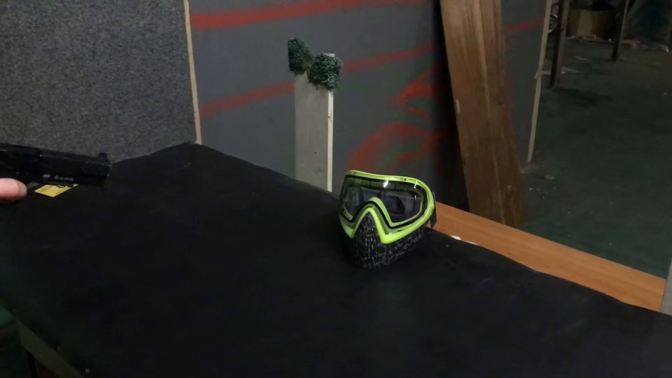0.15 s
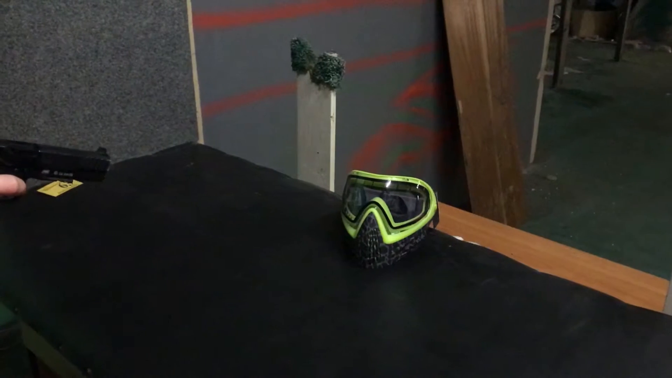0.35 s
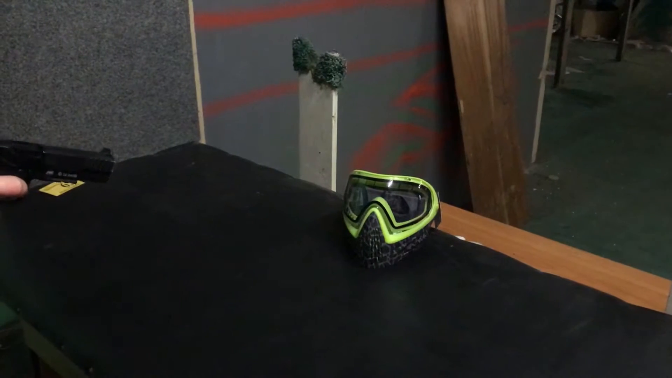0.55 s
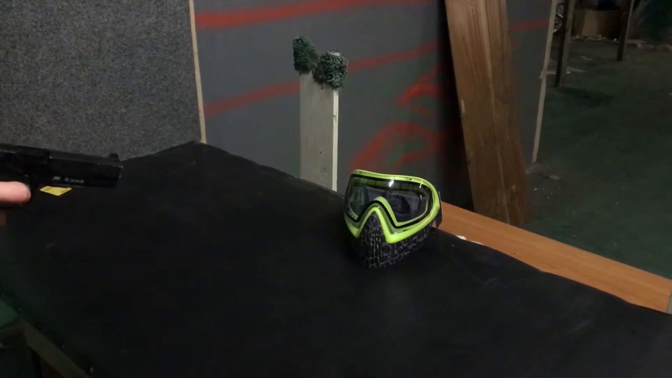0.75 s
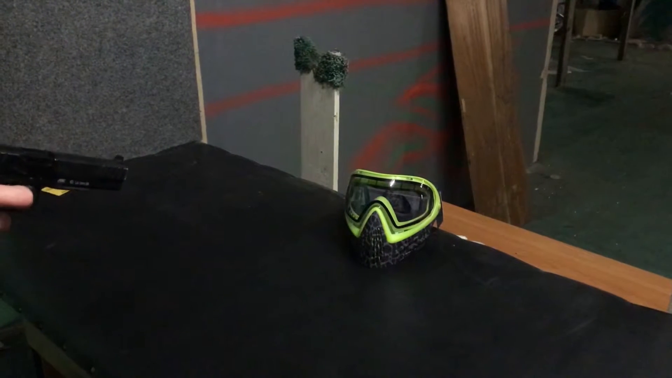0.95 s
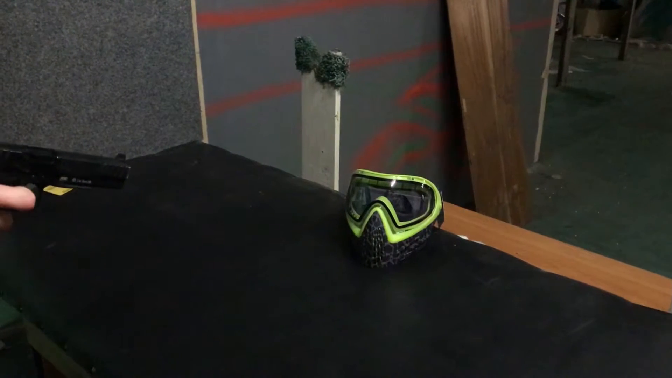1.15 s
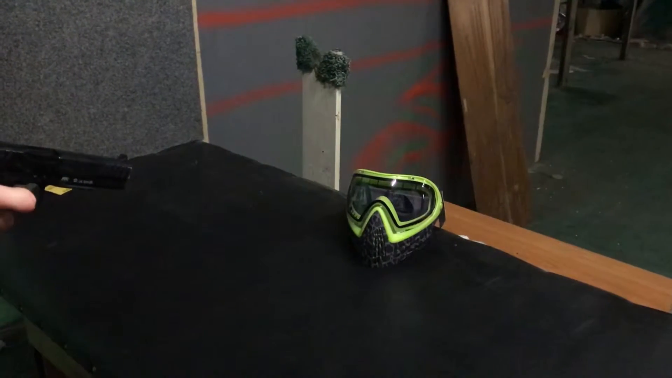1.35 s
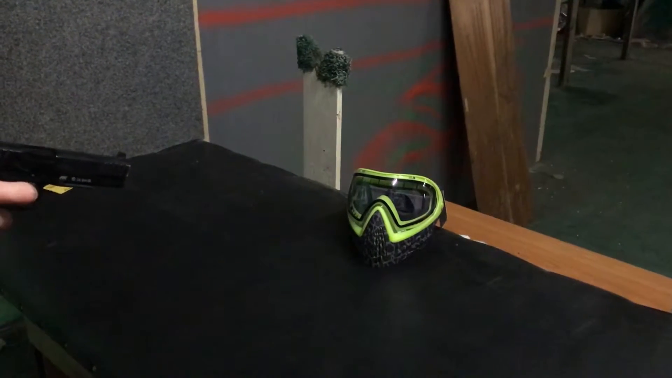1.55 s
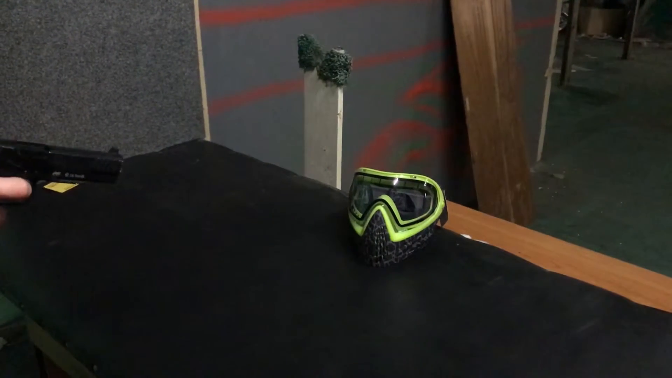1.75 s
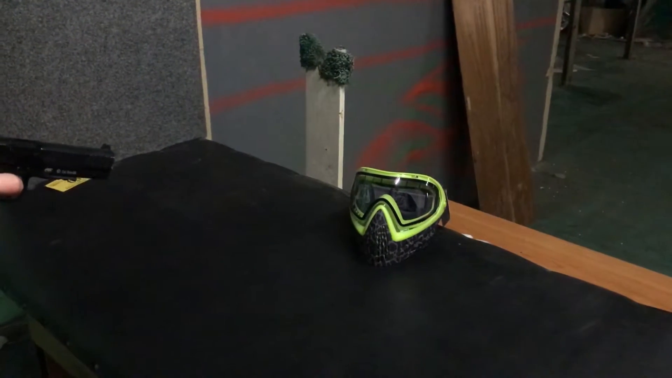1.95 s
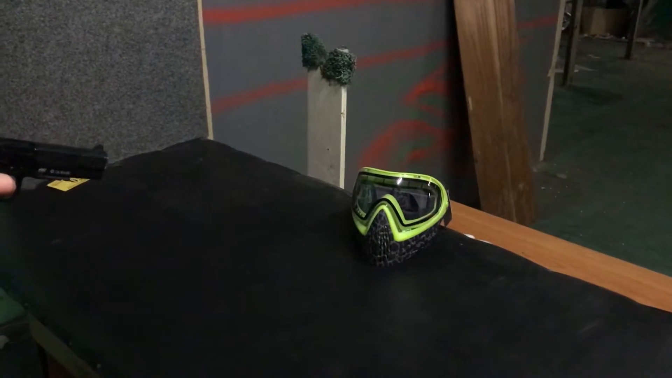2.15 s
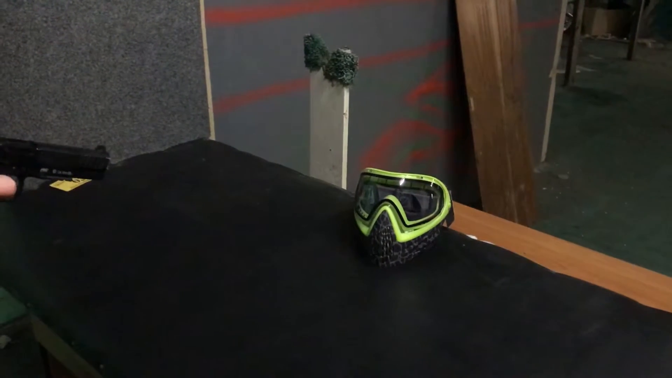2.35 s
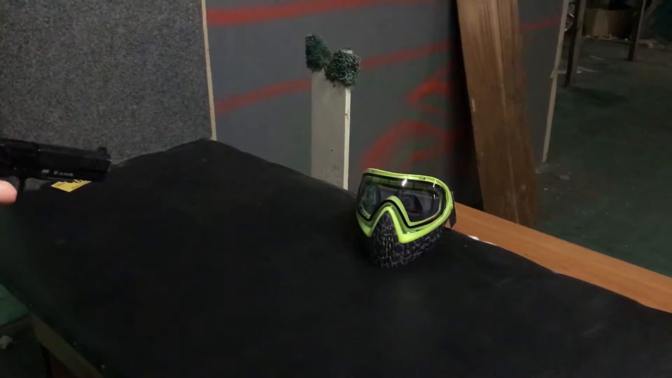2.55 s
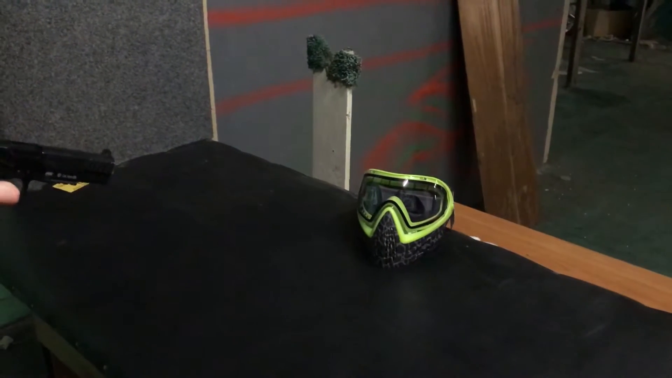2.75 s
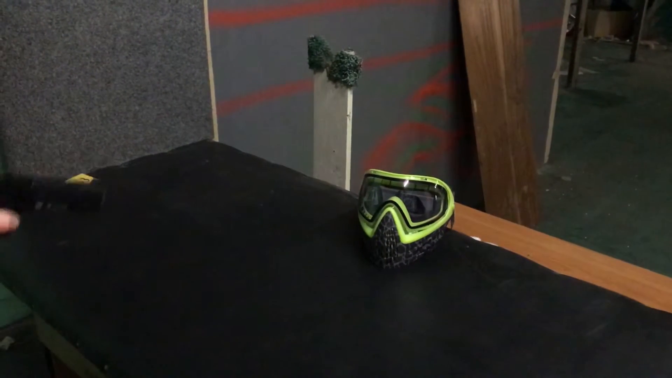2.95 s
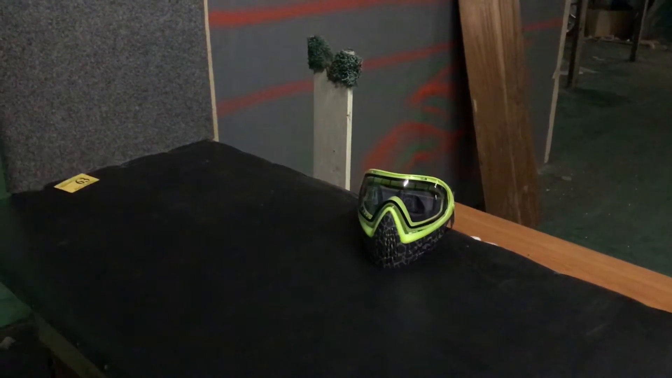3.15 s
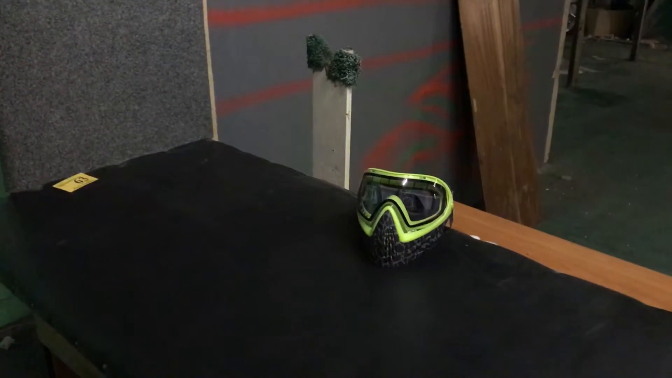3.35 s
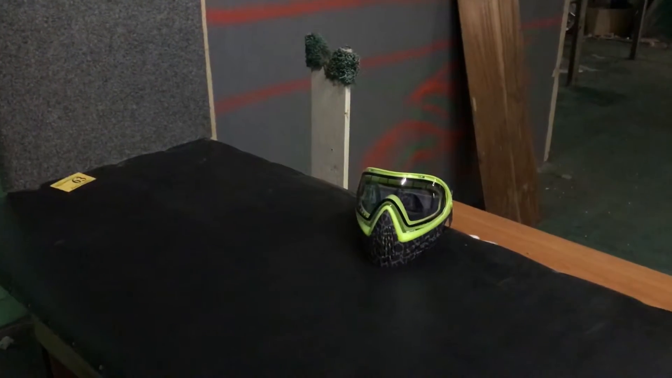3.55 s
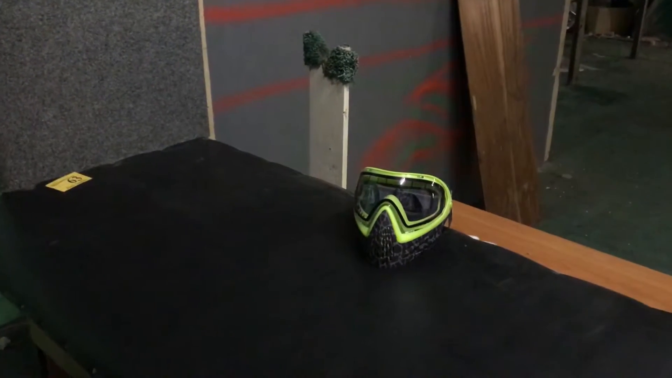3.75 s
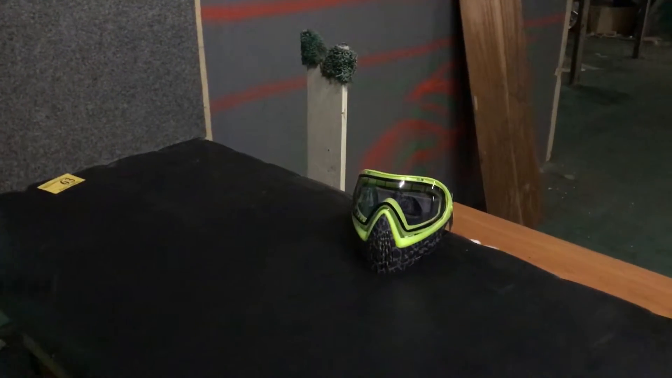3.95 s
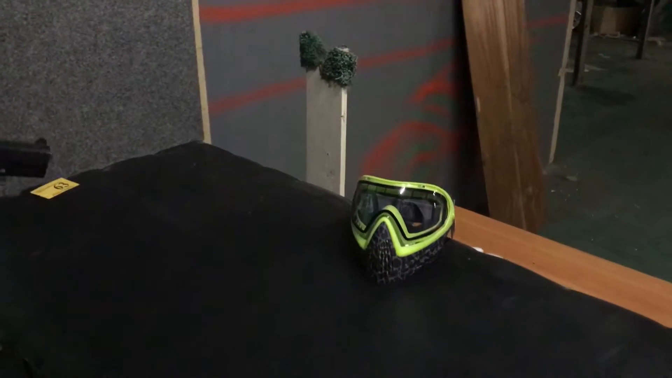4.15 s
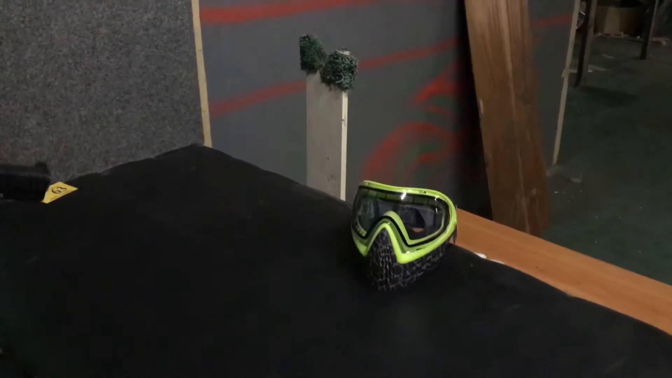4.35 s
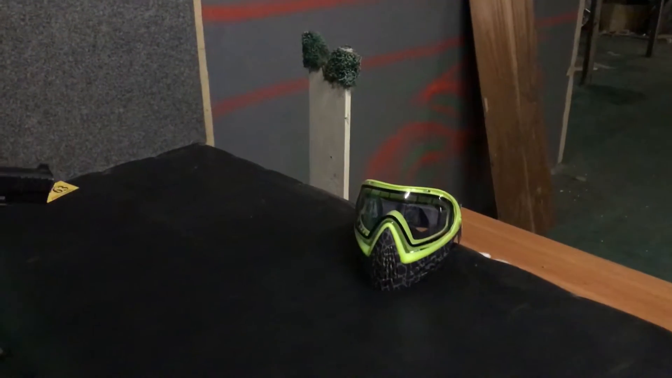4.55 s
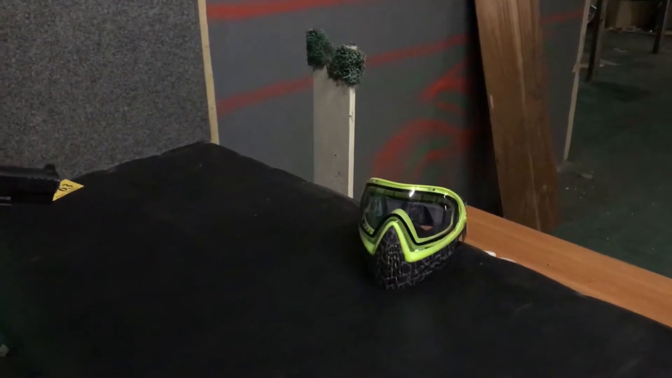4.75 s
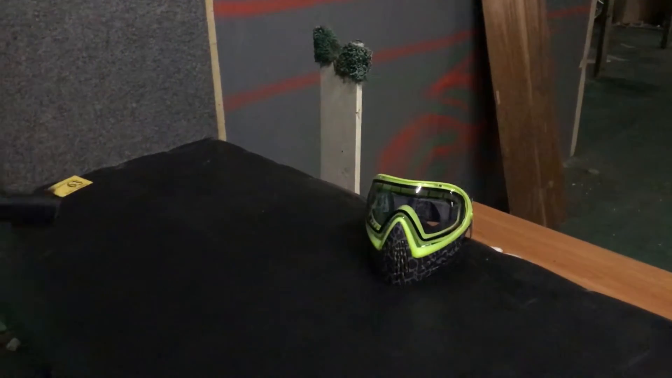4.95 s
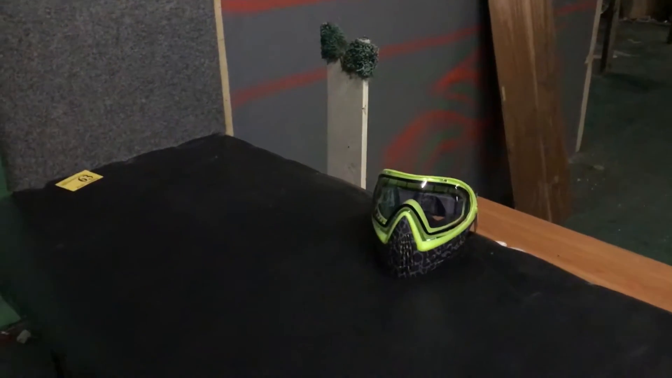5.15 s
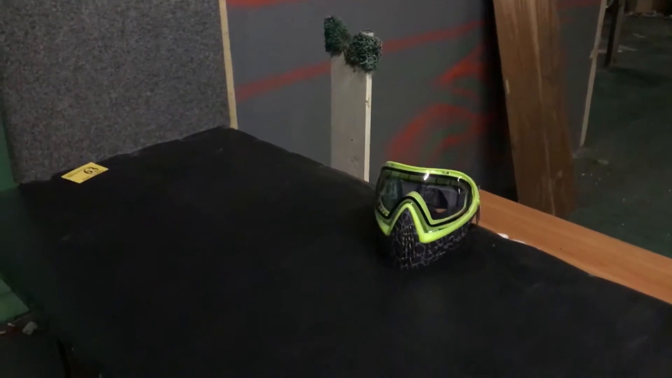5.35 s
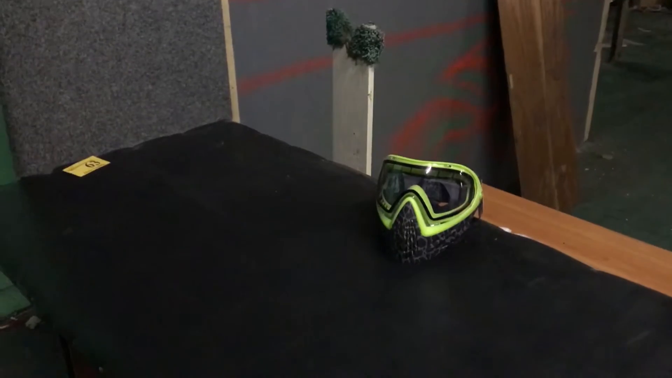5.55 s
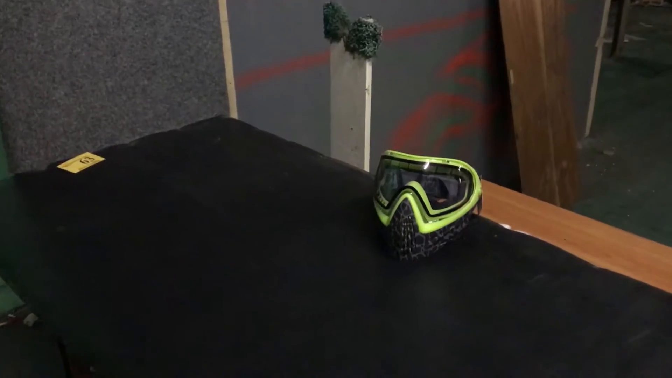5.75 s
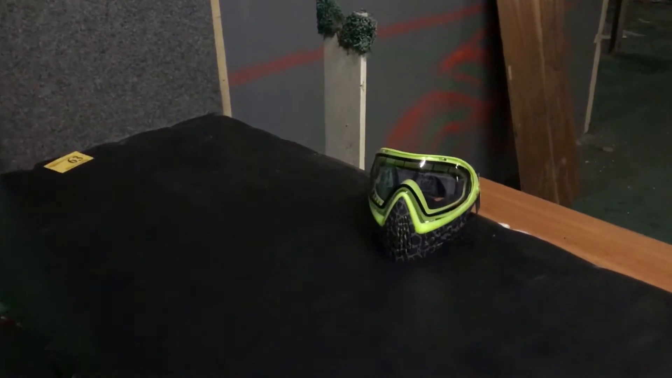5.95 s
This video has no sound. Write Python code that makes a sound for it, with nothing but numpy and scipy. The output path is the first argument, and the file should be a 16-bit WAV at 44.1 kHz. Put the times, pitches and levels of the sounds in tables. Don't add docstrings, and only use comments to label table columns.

```python
import sys
import numpy as np
from scipy import signal
from scipy.fft import rfft, irfft
from scipy.io import wavfile

SR = 44100
rng = np.random.default_rng(int(sys.argv[2]) if len(sys.argv) > 2 else 0)


def amplitude_ratio(level_db):
    exponent = np.asarray(level_db, float) / 20
    return 10 ** exponent


def generate_wav(sig):
    pcm = np.round(np.clip(np.atleast_2d(sig).T, -1, 1) * 32767).astype(np.int16)
    wavfile.write(sys.argv[1], SR, pcm)


N = 264721
LEAD = SR // 2

SHOT_TIMES = [
    -.330,
    1.3101,
    2.6217,
    4.6956,
]
# crack level/dB, slide level/dB, gas level/dB, room send/dB, mask note/dB
SHOT_LEVELS = [
    (-5.5, 0, -16.5, 14.5, -9),
    (-2, -5.5, -19, 15.5, -8.5),
    (-2.5, 1.4, -20, 16, -7),
    (-4, -1, -20, 15.5, -1.5),
]


def rms_one(x):
    return x / np.sqrt(np.mean(x ** 2) + 1e-20)


def add(track, s, sound):
    i = LEAD + round(s * SR)
    track[i:i + len(sound)] += sound[:len(track) - i]


def dying(t60, size):
    return amplitude_ratio(-60 * np.arange(size) / SR / t60)


def coloured(x, points):
    hz, db = np.transpose(points)
    grid = np.fft.rfftfreq(len(x), 1 / SR) + 1
    gain = amplitude_ratio(np.interp(np.log(grid), np.log(hz), db))
    return irfft(rfft(x) * gain, len(x))


def ring(x, hz, t60):
    radius = amplitude_ratio(-60 / (t60 * SR))
    w = 2 * np.pi * hz / SR
    return signal.lfilter([0, np.sin(w)], [1, -2 * radius * np.cos(w), radius ** 2], x + 1e-18)


def peak(x, hz, width):
    return signal.lfilter(*signal.iirpeak(hz, hz / width, fs=SR), x)


def filtered(x, order, hz, kind):
    return signal.sosfilt(signal.butter(order, hz, kind, fs=SR, output="sos"), x)


def tick(db, hz, t60, top_db, spread=1.88):
    body_db = -9.5
    burst = rng.standard_normal(4096) * dying(t60, 4096)
    click = np.eye(1, 4096)[0] * np.sqrt(np.sum(burst ** 2))
    both = np.array([burst, click])
    band = signal.butter(2, [hz / spread, min(hz * spread, .47 * SR)], "band", fs=SR)
    top = signal.lfilter(*signal.butter(2, 5500, "high", fs=SR), both)
    sound = signal.lfilter(*band, both) + amplitude_ratio(top_db) * top + amplitude_ratio(top_db + body_db) * both
    return amplitude_ratio(db) * sound / np.abs(sound[0]).max()


def muzzle_blast():
    table_echo_s = .0015
    direct, send = np.zeros((2, LEAD + N))
    step = np.linspace(1, -1, 7)
    click = np.eye(1, 1024)[0]
    barrel = peak(click, 1790, 120)
    mask = peak(click, 3700, 220)
    for s, (crack_db, _, _, send_db, mask_db) in zip(SHOT_TIMES, SHOT_LEVELS):
        add(direct, s, amplitude_ratio(crack_db) * step)
        add(direct, s + table_echo_s, amplitude_ratio(crack_db) * step)
        add(direct, s - .0006, tick(crack_db - 4.5, 3000, 0.019, -3.5)[0])
        add(send, s, amplitude_ratio(send_db) * (click + barrel + amplitude_ratio(mask_db) * mask))
    return direct, send


def gas_vent():
    # f/Hz, level/dB per Hz
    gas_spectrum = [(180, -40.5), (300, -16), (682, -1), (848, -24.5), (1480, -4.5), (1720, 2), (2240, -6),
                    (3190, -3), (6900, -13), (10500, -11), (14700, -9.5), (15700, -16), (16500, -33)]
    after_s, rise_s, lasts_s, fall_t60 = .0082, 0.0046, 0.014, 0.085
    out, t = np.zeros(LEAD + N), np.arange(8192) / SR
    vent = np.clip(t / rise_s, 0, 1) * amplitude_ratio(-60 * np.maximum(t - lasts_s, 0) / fall_t60)
    for s, (_, _, gas_db, _, _) in zip(SHOT_TIMES, SHOT_LEVELS):
        sputter = amplitude_ratio(2.9 * np.interp(t, t[::64], rng.standard_normal(128)))
        jet = rms_one(coloured(rng.standard_normal(8192), gas_spectrum))
        add(out, s + after_s, amplitude_ratio(gas_db) * vent * sputter * jet)
    return out


def mechanism():
    # t/s from the crack, level/dB, f/Hz, t60/s, top-end level/dB
    trigger_parts = [
        (-.0232, -36.5, 2800, 0.015, -6.5),
        (-.0150, -22.5, 1800, .012, -4),
        (-.0120, -40, 5994, .008, -4),
        (-.0079, -13.5, 5800, .012, -0.5),
        (-.0032, -19.5, 4994, .007, -9),
    ]
    # t/s from the crack, level/dB, f/Hz, t60/s, top-end level/dB
    slide_parts = [
        (.0086, -8, 5000, .009, -4.5),
        (0.0122, -3.5, 2200, .011, -4),
        (.0200, -13.5, 5000, 0.0098, 0),
        (.0285, -11, 3500, .01, -1.1),
        (.0380, -22.5, 9000, .011, -1),
    ]
    scatter_db = 3
    trigger, slide = np.zeros((2, LEAD + N))
    for s, (_, slide_db, _, _, _) in zip(SHOT_TIMES, SHOT_LEVELS):
        for after, *contact in trigger_parts:
            add(trigger, s + after, amplitude_ratio(scatter_db * rng.standard_normal()) * tick(*contact)[0])
        for after, *contact in slide_parts:
            add(slide, s + after, amplitude_ratio(slide_db + scatter_db * rng.standard_normal()) * tick(*contact)[0])
    return trigger, slide


def body_ring(drive):
    # f/Hz, level/dB, t60/s
    frame_modes = [(396, -22.5, 0.013), (516, -24, 0.017), (1200, -21, 0.0092), (1755, -18, 0.016),
                   (3330, -29, 0.0058), (4400, -23, 0.017)]
    return sum(amplitude_ratio(db) * ring(drive, hz, t60) for hz, db, t60 in frame_modes)


def pistol():
    blast, send = muzzle_blast()
    trigger, slide = mechanism()
    gas = gas_vent()
    body = body_ring(blast + slide + amplitude_ratio(-7) * trigger)
    return blast + trigger + slide + gas + body, send


def strike(near, send, s, db, hz, send_db, *contact):
    sound, click = tick(db, hz, *contact)
    add(near, s, sound)
    add(send, s, amplitude_ratio(send_db - 7.5) * click)


def pellets(near, send):
    # t/s, level/dB, f/Hz, room send/dB
    bounces = [(2.9771, -19.5, 4400, 6.5), (1.613, -30.5, 5000, 2.5), (1.651, -36, 11000, 6.5),
               (.4670, -41.5, 9000, 11), (1.524, -39, 9000, 10), (1.6165, -18, 4200, 10),
               (1.746, -36, 12000, 16), (2.3434, -47.5, 11670, 9), (4.063, -48, 9860, 3),
               (4.9780, -25.5, 13000, 0), (5.0255, -48, 13200, -3), (5.1857, -29, 12600, 10),
               (5.28, -58, 9000, 17), (5.513, -54, 8080, 19.5), (5.6641, -23, 11200, 4.5),
               (5.753, -50, 13900, 19), (5.845, -49.5, 6900, 3)]
    # t/s, level/dB, f/Hz, room send/dB
    landings = [
        (0.2101, -22, 4794, 8),
        (4.9776, -19.5, 3990, 5),
        (5.6620, -33, 5100, 18.5),
    ]
    for event in bounces:
        strike(near, send, *event, 0.015, -3.5)
    for s, db, hz, send_db in landings:
        strike(near, send, s, db, hz, send_db, .022, -6)
        strike(near, send, s, db - 11.5, 870, send_db, 0.01, -28.5)


def taps_and_rattles(near, send):
    # t/s, level/dB, f/Hz, room send/dB
    taps = [
        (1.2290, -51.5, 4290, 1.5),
        (1.2331, -50, 4300, 2.5),
        (1.4200, -14, 4970, -4.5),
        (2.8126, -22.5, 7300, 13.5),
        (4.032, -36, 5500, 17),
        (4.0350, -32, 4000, 1.5),
        (.2080, -30, 6000, -6),
    ]
    # t/s, level/dB, f/Hz
    rattles = [(.4615, -53.5, 12100), (.480, -44, 9560), (.488, -52, 11000), (1.0925, -52.5, 2485),
               (1.11, -51.5, 12000), (1.1250, -52.5, 9000), (1.1433, -54.5, 11820), (1.2660, -66, 3957),
               (2.1310, -58, 13000), (2.3370, -61, 10000), (2.4350, -57, 3430), (2.468, -53.5, 9000),
               (2.4775, -43.5, 9000), (2.4915, -49, 5500), (2.5560, -61, 4562), (2.5850, -59, 5500),
               (4.5400, -48, 4000), (4.574, -50, 2990), (2.1030, -57, 6000), (5.171, -45.5, 12200),
               (5.1790, -40, 12000), (5.2240, -43, 13000), (1.099, -53.5, 12950)]
    for event in taps:
        strike(near, send, *event, 0.0042, -8.5)
    for event in rattles:
        strike(near, send, *event, 4, 0.0097, -8)


def knocks(near, send):
    # t/s, level/dB, f/Hz, room send/dB
    dull_knocks = [
        (4.0379, -38.5, 1665, 10.5),
        (1.0940, -52.5, 1200, 14.5),
        (2.1147, -48, 4100, 8),
        (2.4733, -49, 1200, 9.5),
        (5.6710, -28.5, 2110, 10.5),
        (5.671, -33, 3700, 2.5),
        (5.894, -45, 320, 12),
        (5.895, -48, 790, 5.5),
        (5.904, -54, 497, 17),
        (5.915, -48, 129, 4),
    ]
    for s, db, hz, send_db in dull_knocks:
        t60 = 0.0067 + 30 / hz
        top_db = -28.5 + 2 * min(np.log2(hz / 2000), 0)
        strike(near, send, s, db, hz, send_db, t60, top_db, 1.5)


def far_clacks(near, send):
    # t/s, level/dB, f/Hz, room send/dB
    clacks = [
        (1.095, -54, 2484, 5.5),
        (1.1050, -46, 2000, 14),
        (1.1170, -50, 3200, 7),
        (2.474, -45.5, 5200, 12),
        (3.735, -44.5, 6060, 17),
        (3.724, -49.5, 3000, 1.5),
        (3.73, -39.5, 3536, 16),
    ]
    for event in clacks:
        strike(near, send, *event, 0.036, -4.5)


def loose_parts():
    near, send = np.zeros((2, LEAD + N))
    for source in (pellets, taps_and_rattles, knocks, far_clacks):
        source(near, send)
    return near, send


def puffs():
    # t/s, level/dB, settled f/Hz, first crest t/s
    air_puffs = [
        (1.3200, -11.8, 45, .0007),
        (2.6315, -8, 42, .0012),
        (4.7062, -18, 46, .0011),
    ]
    extra_turns, rise_s, fade_s = .255, .0007, .024
    out, t = np.zeros(LEAD + N), np.arange(1, 4096) / SR
    envelope = (1 - np.exp(-t / rise_s)) * np.exp(-(t / fade_s) ** 2)
    for s, db, hz, crest in air_puffs:
        cycles = hz * (t - crest) + extra_turns * np.log(t / crest)
        add(out, s, amplitude_ratio(db) * envelope * np.cos(2 * np.pi * cycles))
    return out


def hall(x):
    # f/Hz, early level/dB, early t60/s, late level/dB, late t60/s
    decay = [(100, -28.5, 0.28, -47.5, 1.1), (294, -30.5, 0.2, -39.5, 1.4), (655, -25.5, 0.1, -42.5, 1.63),
             (1150, -23, 0.14, -36, 1.377), (1800, -27.5, 0.15, -28.5, 1.29), (2800, -28, 0.36, -32, 1.265),
             (3196, -28.5, 0.33, -29.5, 1.084), (5500, -33.5, 0.38, -34, 0.85),
             (9000, -33, 0.34, -39, 0.68), (15000, -33, 0.37, -48, 0.94)]
    far_wall_s, far_wall_db, far_wall_rise_s = 0.22, 4, 0.022
    t = np.arange(2 * SR) / SR
    hz, *columns = np.transpose(decay)
    answer = amplitude_ratio(far_wall_db * (np.clip((t - far_wall_s) / far_wall_rise_s, -1, 0) + 1))
    white = rng.standard_normal((2, len(t)))
    edges = 70 * 2 ** np.arange(0, 8.1, 1 / 3)
    reply = 0
    for k, (low, high) in enumerate(zip(edges, edges[1:])):
        centre = np.log(low * high) / 2
        early_db, early, late_db, late = [np.interp(centre, np.log(hz), c) for c in columns]
        fall = np.hypot(amplitude_ratio(early_db - 60 * t / early), answer * amplitude_ratio(late_db - 6.5 - 60 * t / late))
        uneven = amplitude_ratio(0.61 * np.interp(t, t[::700], rng.standard_normal(126)))
        reply = reply + fall * uneven * filtered(white[k % 2], 2, [low, high], "band")
    return signal.fftconvolve(x, reply * np.clip(t / 0.0061, 0, 1))[:len(x)]


def far_whine():
    # start t/s, end t/s, f/Hz, level/dB
    hums = [
        (2.074, 2.273, 574, -73),
        (4.075, 4.5, 711, -76),
        (4.298, 4.6, 560, -77),
    ]
    t, out = np.arange(N) / SR, np.zeros(N)
    for start, end, hz, db in hums:
        arch = np.sin(np.pi * np.clip((t - start) / (end - start), 0, 1))
        out += amplitude_ratio(db) * arch * rms_one(ring(rng.standard_normal(N), hz, 0.22))
    return out


def room_tone():
    # f/Hz, level/dB per Hz
    air_spectrum = [(15, -35), (25, -9.5), (65, -6), (114, -1.5), (197, -6), (651, -9.5), (1780, -22),
                    (2210, -25), (4020, -24.5), (4990, -30), (6040, -27), (10400, -28.5), (13300, -25.5),
                    (15200, -30), (16500, -49.5)]
    # t/s, level/dB
    draught = [(0.0, -77), (1.35, -67.5), (1.57, -75), (1.9, -69), (2.09, -66), (2.37, -62.5),
               (2.62, -61.5), (2.94, -78), (3.19, -71.5), (3.61, -63.5), (4.23, -64.5), (4.64, -71.5),
               (5.01, -70), (6.0, -59)]
    boom_top_s, boom_width_s = 0.47, 0.48
    t = np.arange(N) / SR
    air = coloured(rng.standard_normal(N), air_spectrum)
    deep = rms_one(filtered(air, 4, 75, "low"))
    low = rms_one(filtered(air, 2, [75, 300], "band"))
    hiss = rms_one(filtered(air, 4, 300, "high"))
    swell = sum(np.exp(-((t - s - boom_top_s) / boom_width_s) ** 2) * (t > s) for s in SHOT_TIMES)
    wander_db = np.interp(t, t[::6000], rng.standard_normal(len(t[::6000])))
    boom = amplitude_ratio(-73.5 + 14.5 * swell + wander_db)
    draught_db = np.interp(t, *np.transpose(draught))
    low_gain = np.hypot(boom, amplitude_ratio(draught_db - 6.5))
    return amplitude_ratio(-72) * hiss + amplitude_ratio(draught_db) * deep + low_gain * low + far_whine()


def scene():
    gun, gun_send = pistol()
    bits, bits_send = loose_parts()
    sound = gun + bits + puffs() + hall(gun_send) + hall(bits_send)
    return (sound[LEAD:] + room_tone())[None]


def top_cut(x):
    return signal.sosfilt(signal.butter(12, 16990, fs=SR, output="sos"), x)


def record(dry):
    dipped = dry - .4 * peak(dry, 10500, 800)
    rounded = 0.9 * np.tanh(dipped / 0.85)
    cut = signal.sosfilt(signal.cheby2(10, 30, 16200, fs=SR, output="sos"), rounded)
    return top_cut(cut)


dry = scene()
out = record(dry)
generate_wav(out)
```